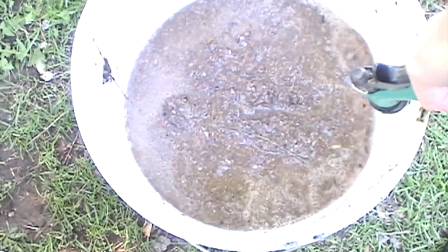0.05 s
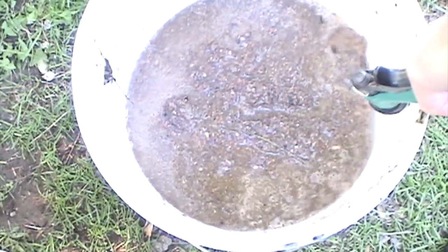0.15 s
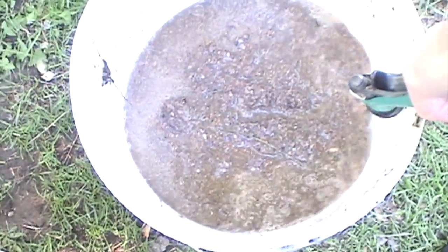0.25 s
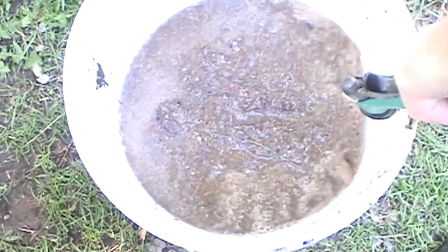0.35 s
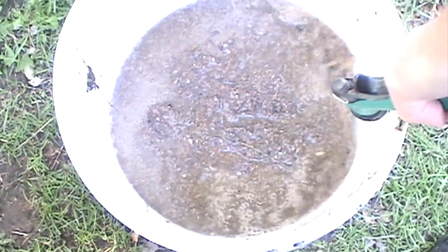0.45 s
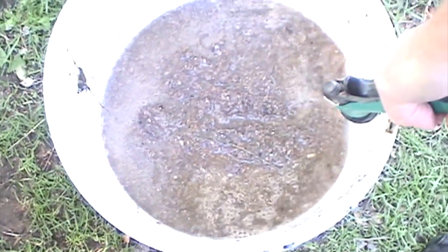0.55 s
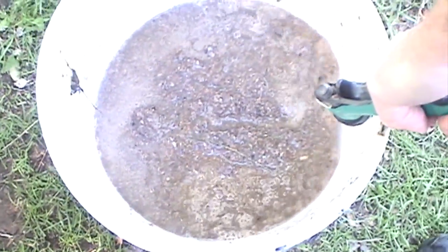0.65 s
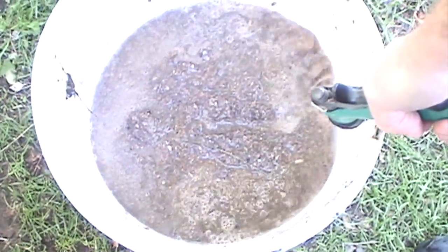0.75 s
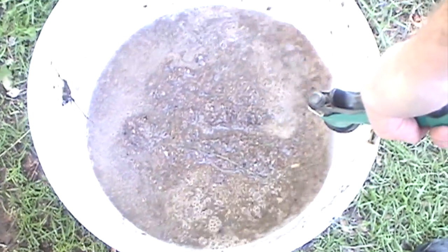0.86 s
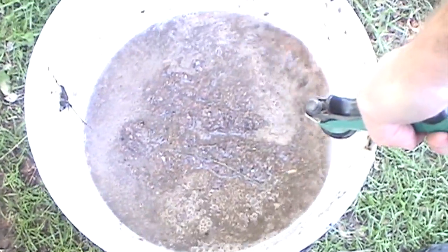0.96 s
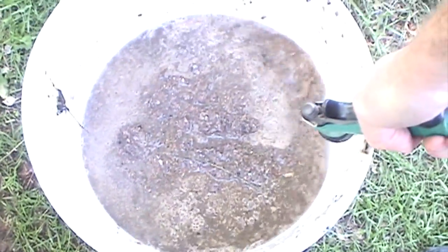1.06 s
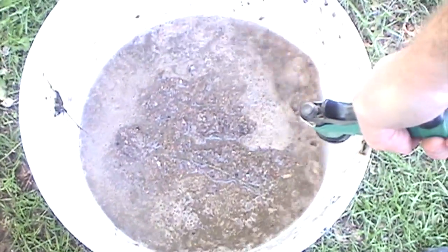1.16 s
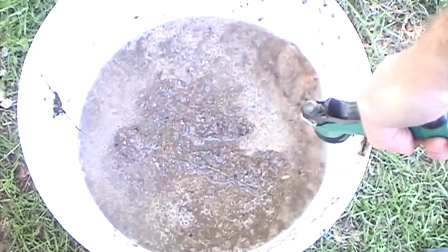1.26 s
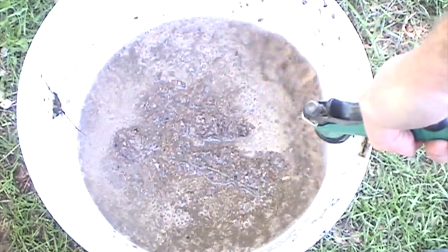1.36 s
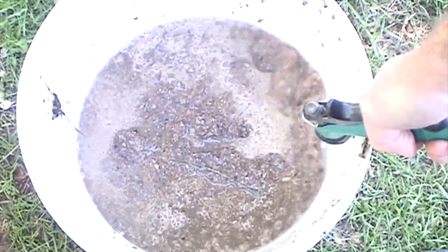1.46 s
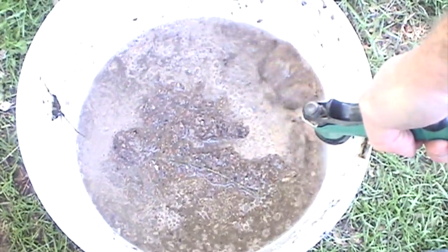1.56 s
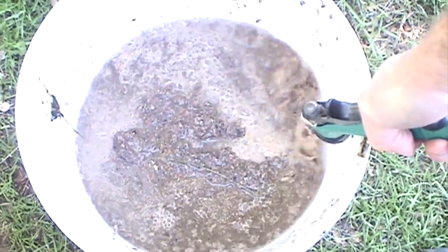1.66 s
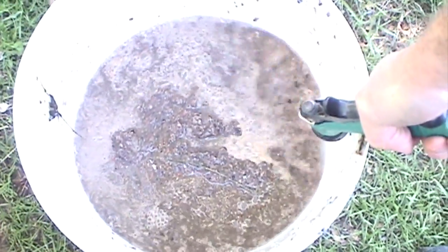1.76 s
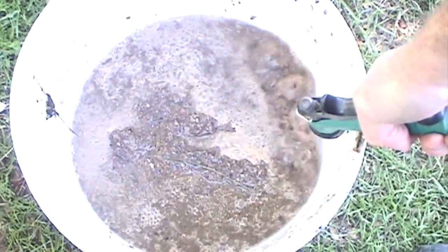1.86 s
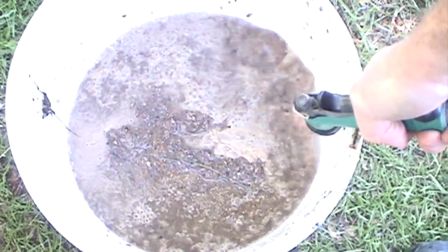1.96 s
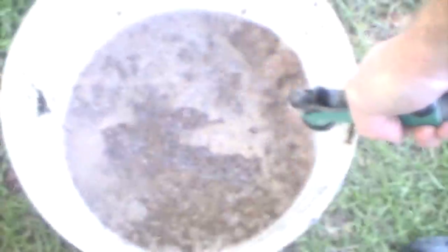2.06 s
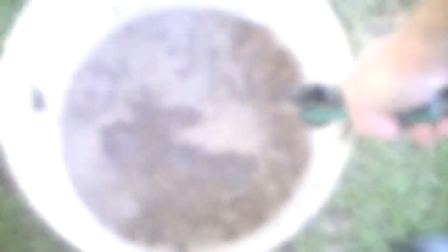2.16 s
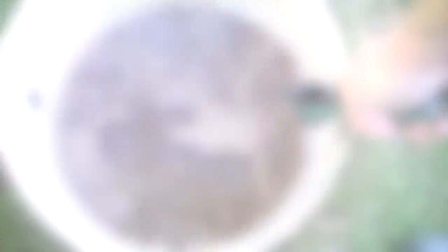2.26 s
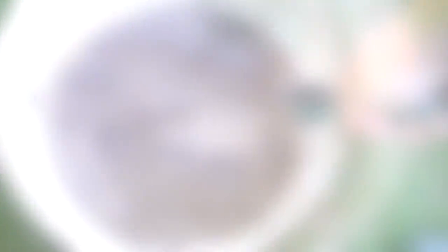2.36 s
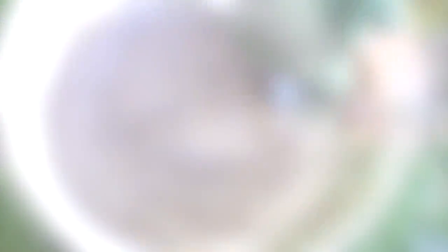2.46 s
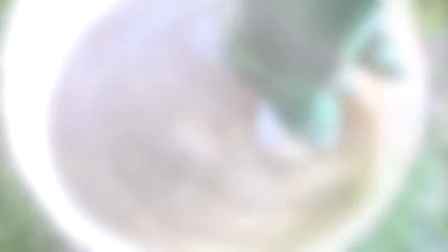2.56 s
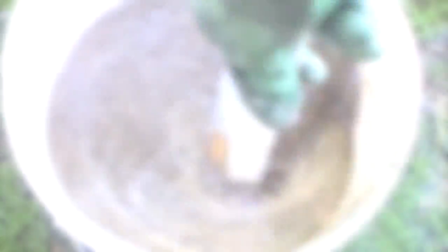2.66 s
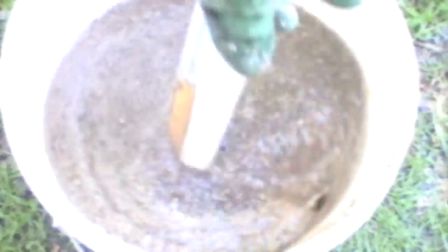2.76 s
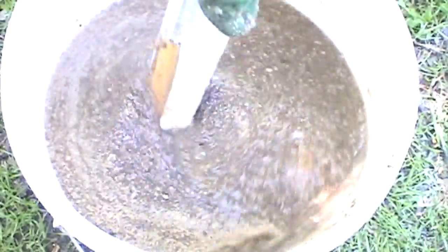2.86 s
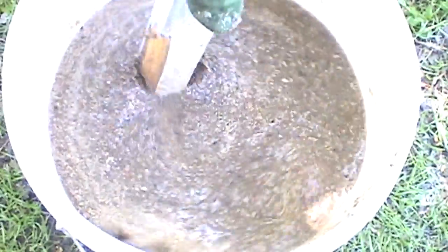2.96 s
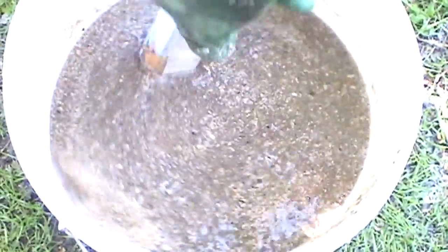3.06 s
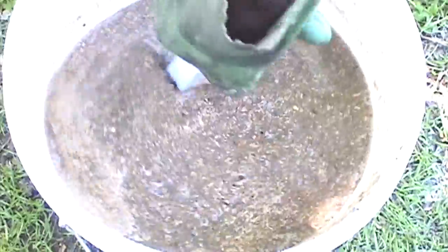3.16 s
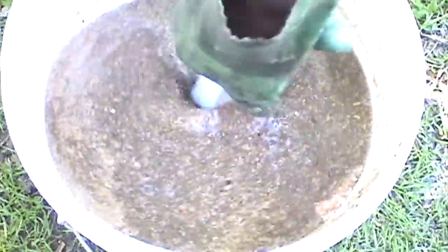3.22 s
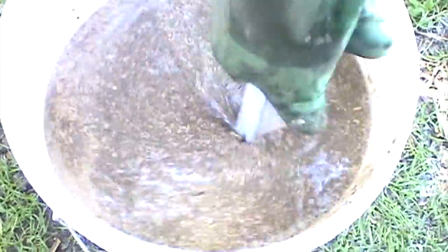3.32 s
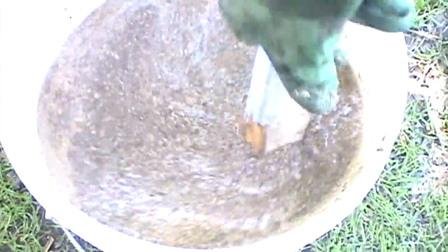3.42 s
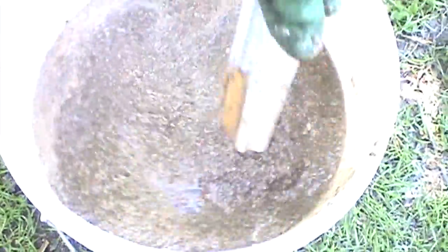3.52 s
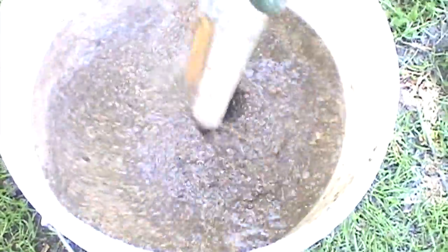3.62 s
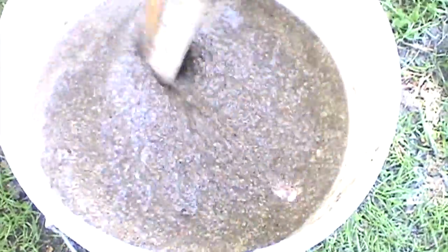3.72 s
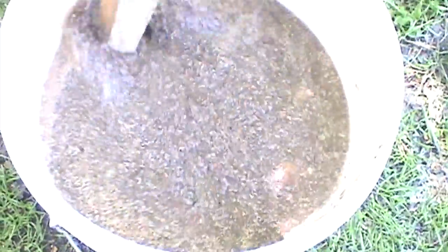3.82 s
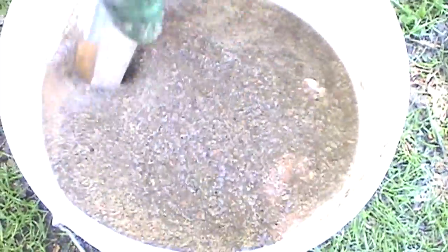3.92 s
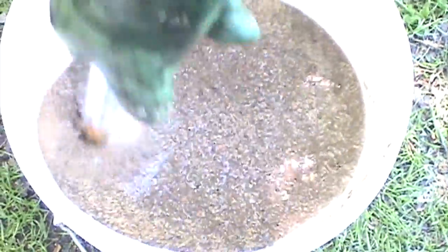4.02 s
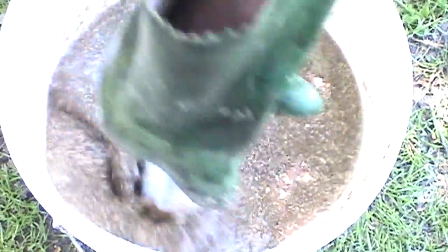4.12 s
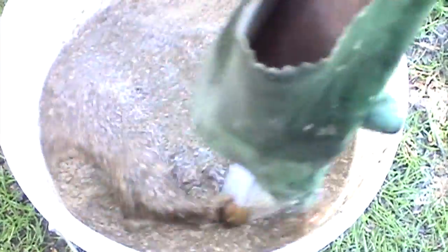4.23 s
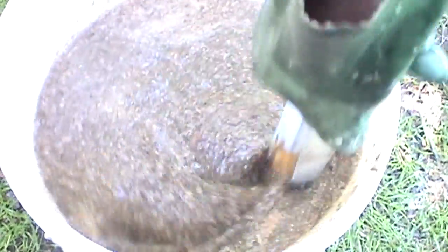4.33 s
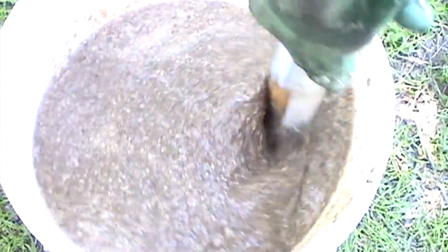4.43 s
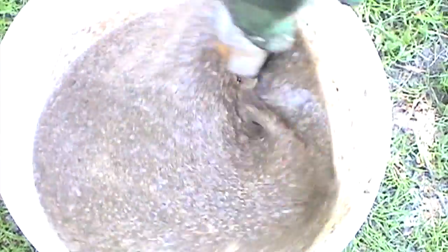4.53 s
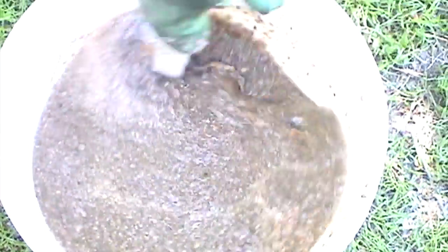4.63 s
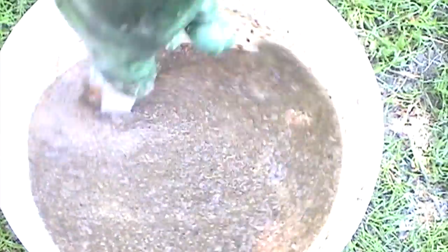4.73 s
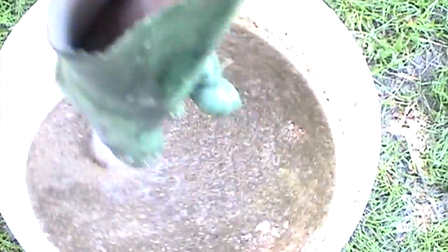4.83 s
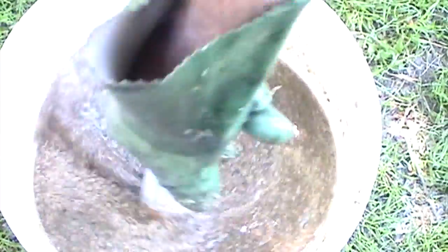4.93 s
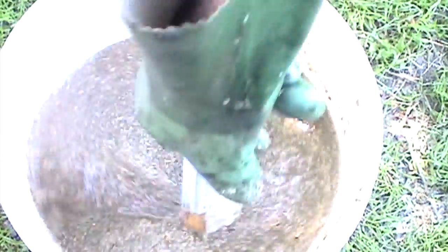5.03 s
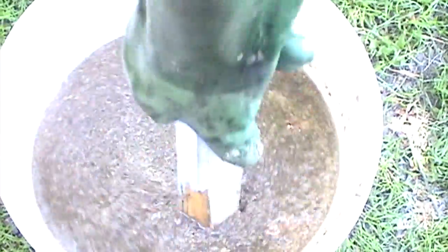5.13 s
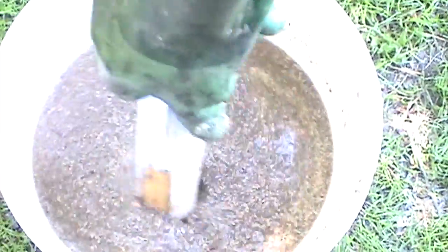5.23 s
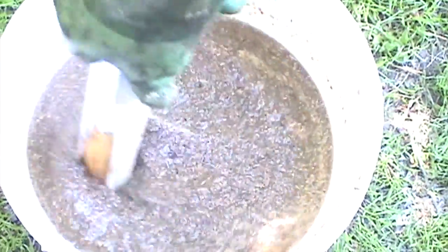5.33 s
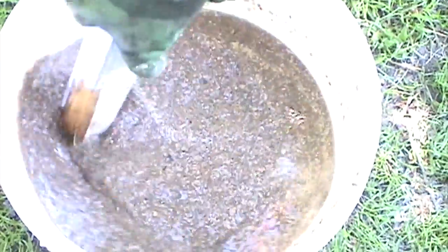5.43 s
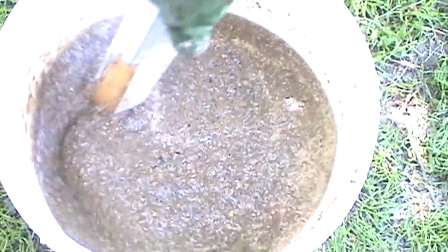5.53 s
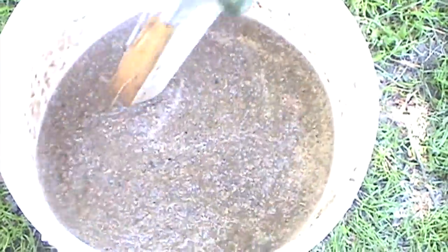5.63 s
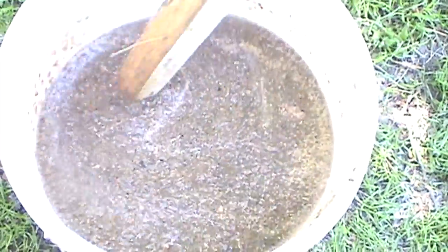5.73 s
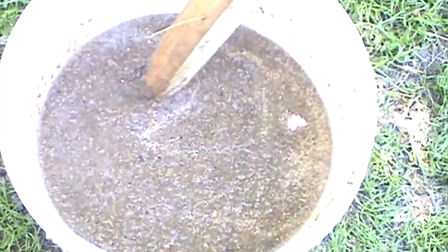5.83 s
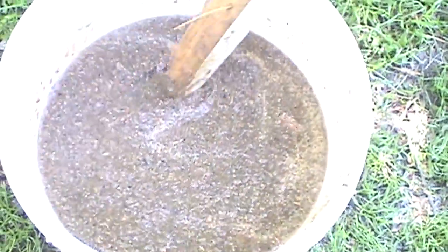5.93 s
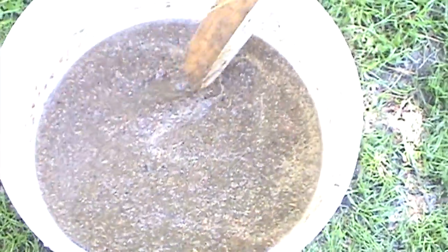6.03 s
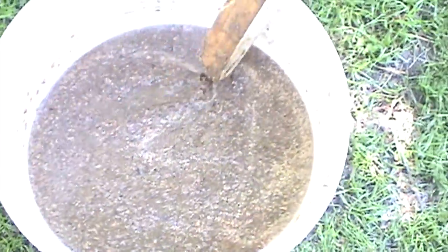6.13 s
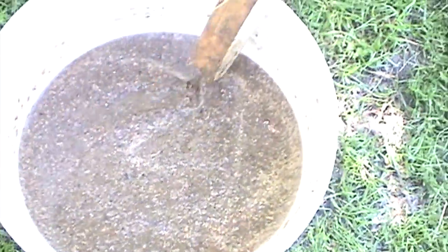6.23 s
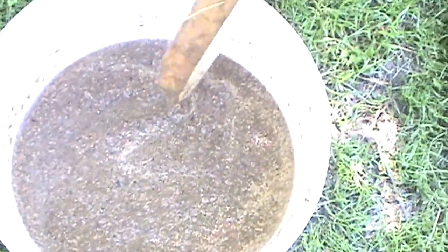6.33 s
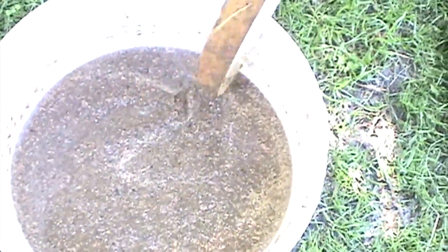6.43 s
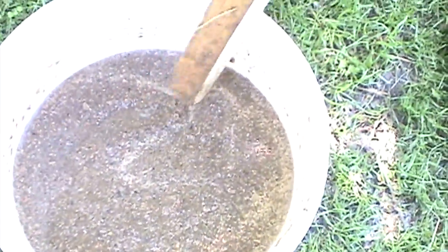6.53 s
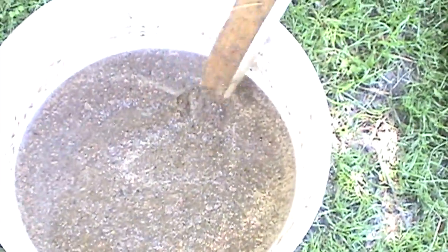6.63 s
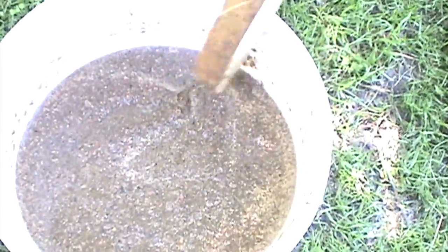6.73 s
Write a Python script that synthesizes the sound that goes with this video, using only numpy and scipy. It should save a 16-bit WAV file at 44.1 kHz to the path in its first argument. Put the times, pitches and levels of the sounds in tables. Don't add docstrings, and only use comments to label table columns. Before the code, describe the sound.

Steady forceful spray fills the first two seconds, ringing the bucket wall and gulping air, then quickly dies. In the much quieter stretch after it, birds whistle high, a stick rubs gritty slurry and bumps the plastic, and grains tick. Two loud hollow knocks with quick bounces end it. Close camera microphone outdoors, nearly mono, with light hiss and a faint high whine.

```python
import sys
import numpy as np
from scipy import signal
from scipy.io import wavfile

SR = 44100
rng = np.random.default_rng(int(sys.argv[2]) if len(sys.argv) > 2 else 0)


def nominal_scale(level):
    x = np.asarray(level, float) / 20
    return 10 ** x


def log_audio(samples):
    frames = np.atleast_2d(samples).T
    limited = np.clip(frames, -1, 1)
    pcm = np.round(limited * 32767).astype(np.int16)
    wavfile.write(sys.argv[1], SR, pcm)


N = 298998

# (level at full flow/dB, share of the fade, change as the bucket fills/dB per s)
SPARKLE_LEVEL = (-28, 0.98, -0.71)


def rms_one(x):
    return x / np.sqrt(np.mean(x ** 2) + 1e-20)


def level_curve(rows):
    s, db = np.transpose(rows)
    return np.interp(np.arange(N) / SR, s, db, left=-120, right=-120)


def drift(rate_hz):
    r = np.exp(-80 * np.pi * rate_hz / SR)
    slow = signal.lfilter([1], [1, -2 * r, r * r], rng.standard_normal(N // 40 + 2002))
    slow = slow[2000:]
    return np.interp(np.arange(N) / 40, np.arange(len(slow)), rms_one(slow - slow.mean()))


def white():
    return rng.standard_normal((2, N))


def droplets(per_s, spread_db):
    sizes = nominal_scale(spread_db * np.minimum(rng.exponential(1, N), 5))
    signs = rng.choice([-1, 1], N)
    return rms_one(sizes * signs * (rng.random(N) < per_s / SR))


def steep(x, hz, kind):
    return signal.sosfilt(signal.butter(4, hz, kind, fs=SR, output="sos"), x)


def resonate(x, hz, width_hz):
    r = np.exp(-np.pi * width_hz / SR)
    poles = [1, -2 * r * np.cos(2 * np.pi * hz / SR), r * r]
    return signal.lfilter([(1 - r * r) / 2, 0, (r * r - 1) / 2], poles, x)


def resonate_twice(x, hz, width_hz):
    return resonate(resonate(x, hz, width_hz), hz, width_hz)


def ring(clicks, hz, t60):
    r, w = nominal_scale(-60 / (t60 * SR)), 2 * np.pi * hz / SR
    return signal.lfilter([0, np.sin(w)], [1, -2 * r * np.cos(w), r * r], clicks + 1e-18)


def banded(spectrum, drive, patchy_db, rate_hz, count=30):
    out, together = 0, drift(rate_hz / 2)
    edges = np.geomspace(20, 16000, count)
    hz, level_db = np.transpose(spectrum)
    for k, (low, high) in enumerate(zip(edges, edges[1:])):
        band_pass = signal.butter(2, [low, high], "band", fs=SR, output="sos")
        band = signal.sosfilt(band_pass, drive[k % 2])
        base_db = np.interp(np.log(low * high) / 2, np.log(hz), level_db)
        flicker_db = patchy_db * (0.47 * together + drift(rate_hz))
        out = out + band * nominal_scale(base_db + flicker_db)
    return rms_one(out)


def with_flow(full_db, share, db_per_s):
    # (t/s, level/dB)
    flow = [
        (0, -0.5),
        (1.0, 0.46),
        (2.1, -1),
        (2.35, -3.5),
        (2.55, -8.5),
        (2.7, -15),
        (2.85, -24.5),
        (3.0, -48),
    ]
    return full_db + share * level_curve(flow) + db_per_s * np.arange(N) / SR


def jet():
    return spray() + churn() + gulps()


def spray():
    # (f/Hz, density/dB per Hz)
    hiss_colour = [(35, -61), (60, -31), (81, -32), (149, -29), (196, -15), (231, -36), (343, 18),
                   (613, -21), (1200, -8.5), (1630, -26.5), (1870, -13.5), (4220, -11.5), (7030, -15.5),
                   (11200, -18), (15500, -31)]
    # (f/Hz, width/Hz, level/dB)
    wall_rings = [(803, 20, 2.5), (877, 49, 1.5), (1050, 57, -5.5), (1233, 103, 2.5), (1290, 52, -4),
                  (1498, 90, 5), (1630, 33, 6.5), (2535, 320, -3.5), (3830, 120, 2.5), (4330, 99, 1),
                  (4725, 44, -5), (5010, 150, -1), (5200, 780, 1.5), (5780, 134, -1.5), (8280, 510, -8.5),
                  (9700, 760, -8.5), (11000, 980, -9.5), (13700, 900, -27)]
    # (f/Hz, width/Hz, level at the start/dB, change/dB per s)
    filling_rings = [(4200, 160, -2, 10), (4550, 200, -4, 8), (8900, 300, 8, -11), (2200, 400, 5, -8),
                     (5300, 200, 9, -8)]
    # (level at full flow/dB, share of the fade, change/dB per s)
    splash_level = (-24, 0.95, -0.15)
    hiss_level = (-26, 1, 0.1)

    drive = white() + 0.5 * droplets(per_s=3400, spread_db=5.5)
    hiss = rms_one(steep(banded(hiss_colour, drive, patchy_db=1.5, rate_hz=11), 753, "high"))
    wall = 0
    for k, (hz, width_hz, db) in enumerate(wall_rings):
        own_drops = np.roll(drive[0], (k + 1) * SR // 10)
        wall = wall + nominal_scale(db + 0.63 * drift(1.7)) * resonate(own_drops, hz, width_hz)
    whole = off_the_wall(hiss, lag_s=0.001074, wander_s=0.00004, share=0.057) + nominal_scale(2) * rms_one(wall)
    filled_s = np.minimum(np.arange(N) / SR, 1.3)
    for hz, width_hz, db, db_per_s in filling_rings:
        whole = whole + nominal_scale(db + db_per_s * filled_s) * resonate(drive[1], hz, width_hz)

    body = rms_one(steep(whole, 3650, "low"))
    middle = rms_one(steep(steep(whole, 3800, "high"), 7400, "low"))
    sparkle = rms_one(steep(whole, 8020, "high"))
    return (nominal_scale(with_flow(*splash_level)) * body + nominal_scale(with_flow(*hiss_level)) * middle
            + nominal_scale(with_flow(*SPARKLE_LEVEL) + 0.99 * drift(43)) * sparkle)


def off_the_wall(x, lag_s, wander_s, share):
    lag = (lag_s + wander_s * drift(1.24)) * SR
    return x + share * np.interp(np.arange(N) - lag, np.arange(N), x)


def churn():
    # (f/Hz, width/Hz, level/dB)
    air_rings = [(141.5, 24.6, -9), (253.5, 6.4, 1.5), (307.3, 43.5, 0), (358.8, 84, 1.5),
                 (414.3, 50, -2.5), (478, 42, -8)]
    # (level at full flow/dB, share of the fade, change/dB per s)
    boom_level = (-26.5, 0.94, 0.4)
    drive = white() + 0.45 * droplets(per_s=150, spread_db=2.5)
    boom = 0
    for k, (hz, width_hz, db) in enumerate(air_rings):
        boom = boom + nominal_scale(db + 1.6 * drift(40)) * resonate_twice(drive[k % 2], hz, width_hz * 1.29)
    return nominal_scale(with_flow(*boom_level) + 0.3 * drift(5.6)) * rms_one(steep(boom, 69, "high"))


def gulps():
    # (t/s, peak level/dB, f/Hz)
    pockets = [(0.033, -8, 330), (0.1516, 0.5, 344), (0.32, -22, 369), (0.439, -7, 336), (0.625, -7, 345),
               (0.861, -19, 372), (0.951, -7, 315), (1.228, -7.5, 316), (1.37, -15, 336), (1.474, -6, 402),
               (1.762, -8, 356), (1.879, -11, 325), (2.011, -21, 342), (2.179, -6, 348)]
    out, t = np.zeros(N), np.arange(round(0.06 * SR)) / SR
    swell = (t / 0.0051) * np.exp(1 - t / 0.0039)
    for s, db, hz in pockets:
        out[round(s * SR):][:len(t)] += nominal_scale(db - 6) * np.sin(2 * np.pi * hz * t) * swell
    return out


def contacts():
    # (t/s, boom peak level/dB, thud over boom/dB, wall over boom/dB, rub length/s)
    stirring = [(3.433, -12.5, -7.5, -30, 0.014), (3.45, -23.5, -1, -16.5, 0.03),
                (3.466, -25, 2, -11, .011), (3.807, -65, 3, -7, .0085), (3.888, -33, 6, -8, 0.011),
                (3.906, -30.5, -12, -14, 0.02), (3.949, -38, -22, -13, 0.014),
                (4.143, -19.5, -13, -9.5, .011), (4.157, -28.5, -1.5, -6, 0.013),
                (4.229, -33, -11, -16, .012), (4.572, -36, -14, -11, 0.0066),
                (5.082, -28, -1.5, -25, 0.017), (5.099, -41, -17, -15, 0.068),
                (5.456, -38, -5, -9.5, 0.017), (6.171, -15.5, -11.5, -17.5, .01),
                (6.199, -21.5, -8, -8.5, 0.0091)]
    # (t/s, boom peak level/dB, stretch of the bounces, extra wall level/dB)
    falls = [
        (6.469, -6.5, 1.15, -1.5),
        (6.695, -2.5, 0.95, 2),
    ]
    # (delay/s, level change/dB, thud over boom/dB, wall over boom/dB, rub length/s)
    bounces = [
        (0, 1, -14, -15, 0.0084),
        (0.0114, -7.5, -20, -15.5, 0.015),
        (0.028, -16, -12, -7, .03),
        (.058, -21.5, -9, -13.5, 0.036),
    ]
    touches = list(stirring)
    for s, db, stretch, more_db in falls:
        for after, lost_db, thud_db, wall_db, rub_s in bounces:
            touches.append((s + after * stretch, db + lost_db, thud_db, wall_db + more_db, rub_s))
    return touches


def knocks():
    # (f/Hz, level/dB, t60/s)
    thud_modes = [(93.5, -9.5, 0.11), (137, -2, 0.18), (168.5, 2, 0.078)]
    boom_modes = [(241, -4.5, 0.01), (273, -1.5, 0.082), (330, -6.5, 0.063), (379.6, -3, 0.1),
                  (445, -0.5, 0.068), (517.5, -2.5, 0.051), (646, -9.5, 0.023)]
    wall_modes = [(722, 0, 0.055), (870, -0.5, 0.038), (940, -9.5, 0.16), (1197, 0.5, 0.029),
                  (1270, 0, 0.048), (1350, 2, 0.016), (1460, 1, 0.027), (1575, 3.5, 0.024),
                  (1782, -11, 0.073)]
    rim_modes = [(2290, -6.5, 0.047), (2580, 3, 0.013), (3040, -1, 0.0061), (3820, 4, 0.007),
                 (4300, -6, 0.0095), (5300, 2.5, 0.0062), (6580, -17, .006), (8500, -14, 0.0034),
                 (10000, -10, 0.004)]
    out, span = np.zeros(N + SR), round(0.3 * SR)
    t = np.arange(span) / SR
    for s, boom_db, thud_over_db, wall_over_db, rub_s in contacts():
        thud_db, wall_db = boom_db + thud_over_db, boom_db + wall_over_db
        contact = np.exp(-(t / max(rub_s, 0.002)) ** 2)
        touching = rng.random(span) < 900 / SR
        chatter = 0.41 * rng.choice([-1, 1], span) * touching * contact
        chatter[0] = 1
        grit = 0.25 * rng.standard_normal(span) * contact * np.minimum(t / 0.0064, 1)
        groups = ((thud_modes, thud_db - 9, chatter), (boom_modes, boom_db - 9, chatter),
                  (wall_modes, wall_db - 1, chatter), (rim_modes, -26.5 + 0.8 * wall_db, grit))
        i = round(s * SR)
        for modes, group_db, drive in groups:
            for k, (hz, mode_db, t60) in enumerate(modes):
                strength = nominal_scale(group_db + mode_db + rng.normal(0, 1.55)) * (-1) ** k
                out[i:i + span] += strength * ring(drive, hz, t60)
    return out[:N]


def slosh():
    # (f/Hz, density/dB per Hz)
    grit_colour = [(100, -29), (200, 4), (500, 1), (1200, -11.5), (2000, -7), (3000, -7.5), (5000, -11.5),
                   (7600, -16), (9000, -34), (16000, -50)]
    late = np.arange(N) / SR - 3.24
    stroke_db = -44 + np.minimum(17 * late, -144 * late)
    drive = white() + 0.23 * droplets(per_s=2700, spread_db=5)
    return nominal_scale(stroke_db) * banded(grit_colour, drive, patchy_db=1.5, rate_hz=11, count=16)


def ticks():
    # (t/s, peak level/dB, f/Hz, dying time/s)
    grit_snaps = [(4.044, -34, 1230, 0.0044), (4.148, -30.5, 4900, 0.0048), (4.165, -40, 8500, .004),
                  (4.2165, -37, 7500, .001), (4.2855, -30.5, 1500, 0.0026), (4.286, -34, 8500, .001),
                  (4.32, -43, 7500, .001), (4.412, -43, 7500, .001), (4.469, -35, 4300, 0.0014),
                  (4.57, -29, 4580, .0011), (4.5735, -28, 3500, .0008), (4.573, -31.5, 905, 0.0043),
                  (4.583, -29, 7800, .0018), (5.456, -37, 4000, .006), (5.468, -41, 5000, .0053)]
    # (t/s, peak level/dB, f/Hz, dying time/s)
    bubble_pops = [(3.452, -41, 4020, .01), (3.906, -41, 4300, .005), (3.96, -46, 3200, .006),
                   (4.046, -32.5, 5300, 0.0023), (4.148, -32, 12600, 0.0024), (4.161, -29, 5300, .004),
                   (4.1685, -23, 3300, .0065), (4.172, -36, 6250, 0.0054), (4.234, -37, 860, 0.049),
                   (4.243, -40, 8300, .002), (4.244, -37, 5570, 0.0033), (4.394, -33.5, 3900, 0.0033),
                   (4.394, -35, 1350, 0.0026), (4.3945, -41, 8400, .002), (4.697, -33, 5300, 0.0014),
                   (4.7, -34, 2250, 0.0026), (6.4697, -29.5, 5300, .003), (6.696, -30, 4840, .0058)]
    out, t = np.zeros(N), np.arange(round(0.08 * SR)) / SR
    for rows, width in ((grit_snaps, 1.0), (bubble_pops, 0.24)):
        for s, db, hz, dying_s in rows:
            burst = rng.standard_normal(len(t)) * np.exp(-t / max(dying_s, 0.0003))
            snap = resonate_twice(burst, hz, width * hz)
            out[round(s * SR):][:len(t)] += nominal_scale(db) * snap / np.abs(snap).max()
    return out


def birds():
    calls = (near_song() + far_chirps()) * nominal_scale(3 * drift(90))
    t = np.arange(round(0.2 * SR)) / SR
    echoes = nominal_scale(-32.5) * rng.standard_normal(len(t)) * np.exp(-t / 0.038) * (t > 0.006)
    echoes[0] = 1
    return signal.fftconvolve(calls, echoes)[:N]


def near_song():
    # (t/s, length/s, f/Hz, peak level/dB, time to the peak/s)
    held_notes = [
        (2.803, 0.07, 4550, -43.5, .012),
        (3.003, 0.11, 4590, -43.5, 0.072),
        (3.213, .15, 4630, -49.5, 0.028),
        (3.49, .05, 3780, -61, .025),
    ]
    # (t of the top/s, level/dB, lowest f/Hz, time held there/s)
    arched_notes = [
        (2.936, -45, 5300, 0.025),
        (3.154, -46, 5230, 0.013),
        (3.372, -55.5, 5280, .022),
    ]
    out = 0
    for s, length, hz, db, peak_s in held_notes:
        t = np.linspace(0, length, num=30)
        swell_db = np.interp(t, [0, peak_s, length], [-6, 0, -11.5])
        out += whistle(s + t, hz + 170 * np.exp(-t / 0.016), db + swell_db)
    top_hz, flick_hz, flick_s, fall_hz_per_s = 5960, 700, 0.021, 27000
    for s, db, low_hz, held_s in arched_notes:
        end = (top_hz - low_hz) / fall_hz_per_s + held_s
        t = np.linspace(-flick_s, end, num=30)
        below_hz = np.where(t < 0, flick_hz * (t / flick_s) ** 2, fall_hz_per_s * t)
        fade_db = -6 * np.where(t < 0, -t / flick_s, t / end)
        out += whistle(s + t, np.maximum(top_hz - below_hz, low_hz), db + fade_db)
    return out


def far_chirps():
    # (t/s, length/s, start f/Hz, end f/Hz, level/dB)
    chirps = [
        (5.709, 0.019, 2900, 2770, -54.5),
        (5.726, 0.025, 3100, 3100, -62),
        (5.736, .016, 2800, 2800, -66),
        (5.882, .012, 3250, 2900, -58),
        (5.888, 0.016, 2900, 2830, -56),
        (6.048, 0.03, 3000, 2700, -57),
        (6.305, 0.035, 1700, 1400, -57),
        (6.292, .015, 5750, 4300, -64),
        (6.325, .015, 5800, 5750, -64),
        (3.43, .03, 4200, 4700, -62),
    ]
    return sum(whistle([s, s + length], [start_hz, end_hz], [db, db])
               for s, length, start_hz, end_hz, db in chirps)


def whistle(s, hz, db):
    out, t = np.zeros(N), np.arange(round(s[0] * SR), round(s[-1] * SR)) / SR
    edge = np.clip(np.minimum(t - s[0], s[-1] - t) / 0.0038, 0, 1)
    phase = 2 * np.pi * np.cumsum(np.interp(t, s, hz)) / SR
    out[round(s[0] * SR):][:len(t)] = np.sqrt(2) * edge * nominal_scale(np.interp(t, s, db)) * np.sin(phase)
    return out


def surroundings():
    # (f/Hz, density/dB per Hz)
    air_colour = [(12, -30), (20, 4.5), (81, 1), (171, -7), (672, -10), (841, -14.5), (914, -10.5),
                  (1430, -15), (3120, -19), (3690, -19.5), (4870, -19), (5450, -20), (8760, -26),
                  (14100, -29), (15700, -20)]
    # (t/s, level/dB)
    swirl_level = [
        (2.9, -50),
        (3.07, -43.5),
        (3.63, -62),
        (4.12, -42.5),
        (4.8, -55),
        (5.6, -50.5),
        (5.83, -63),
        (6.6, -55),
        (6.78, -39),
    ]
    swirl = resonate(white()[0] + 0.25 * droplets(per_s=350, spread_db=-17), 300, 460)
    air = nominal_scale(-49) * banded(air_colour, white(), patchy_db=1.5, rate_hz=9.6)
    return air + nominal_scale(level_curve(swirl_level) - 8 + 2 * drift(5.8)) * rms_one(swirl)


def camera_whine():
    # (multiple of the drum rate, rms level/dB)
    drum_lines = [(3, -69), (13, -69), (14, -69), (15, -64), (16, -61), (17, -66), (18, -73), (19, -68),
                  (20, -73), (21, -75), (22, -74), (23, -80), (24, -81), (27, -79), (33, -78), (34, -77),
                  (35, -76), (36, -79), (37, -79), (38, -81), (39, -83)]
    # (f/Hz, rms level/dB)
    scan_lines = [(15734.3, -71), (15747.3, -77), (15674.4, -84)]
    drum_hz = 299.7
    t = np.arange(N) / SR
    comb = sum(nominal_scale(db) * np.cos(2 * np.pi * k * drum_hz * t) for k, db in drum_lines)
    scan = sum(nominal_scale(db) * np.sin(2 * np.pi * hz * t) for hz, db in scan_lines)
    return np.sqrt(2) * (comb + scan)


def side_hiss():
    # (f/Hz, density/dB per Hz)
    side_colour = [(12, -29), (20, 1), (731, -14), (966, -40), (1600, -27), (3590, -20), (6620, -45),
                   (8510, -14.5), (15700, -12.5)]
    apart = white()
    steady = nominal_scale(-71) * banded(side_colour, apart, patchy_db=4, rate_hz=4.4, count=12)
    jet_db = with_flow(*SPARKLE_LEVEL) - 30
    return steady + nominal_scale(jet_db) * rms_one(resonate_twice(apart[0], 12400, 3700))


def scene():
    mid = jet() + knocks() + slosh() + ticks() + birds() + surroundings() + camera_whine()
    side = side_hiss()
    return np.array([mid + side, mid - side])


def low_pass(x):
    return signal.sosfilt(signal.butter(12, 15880, fs=SR, output="sos"), x)


def record(dry):
    rounded = 0.93 * np.tanh(dry / 0.86)
    top_cut = signal.ellip(12, 0.5, 30, 15765, fs=SR, output="sos")
    return low_pass(signal.sosfilt(top_cut, rounded))


dry = scene()
out = record(dry)
log_audio(out)
```